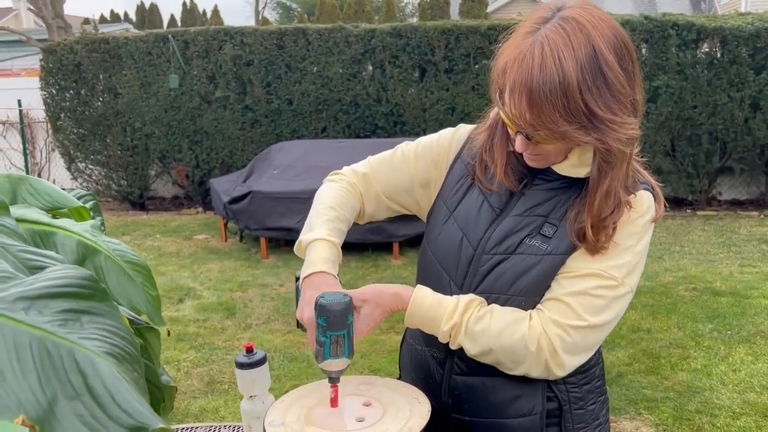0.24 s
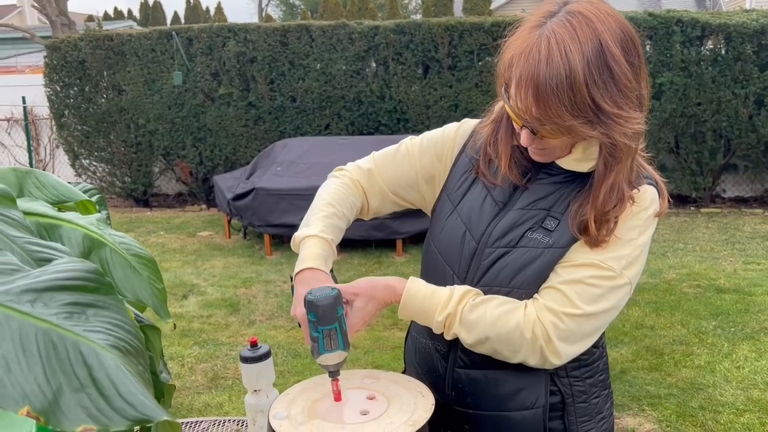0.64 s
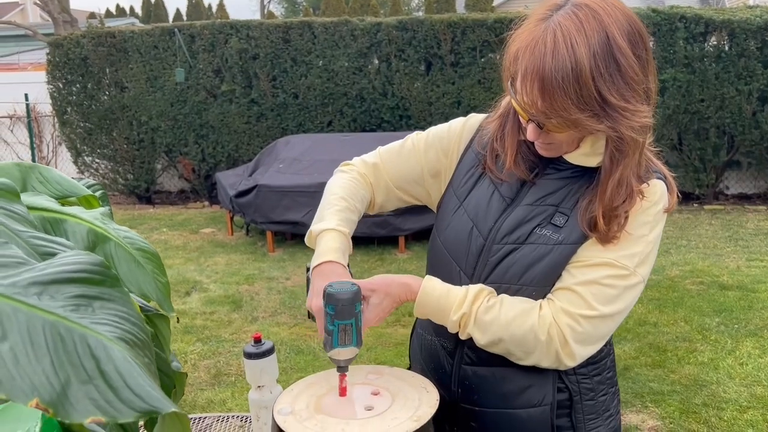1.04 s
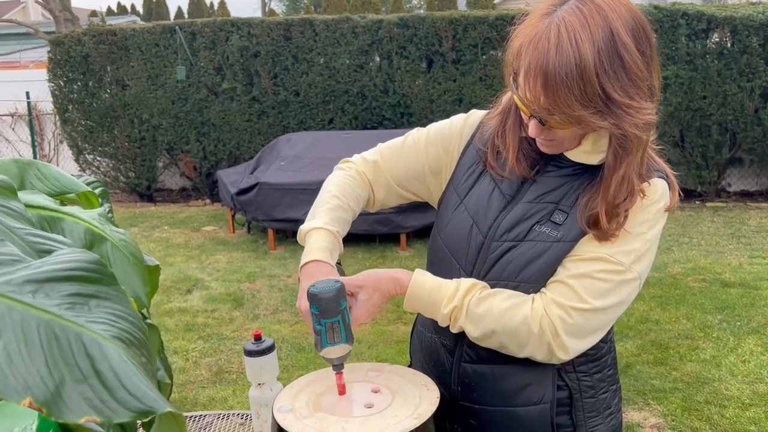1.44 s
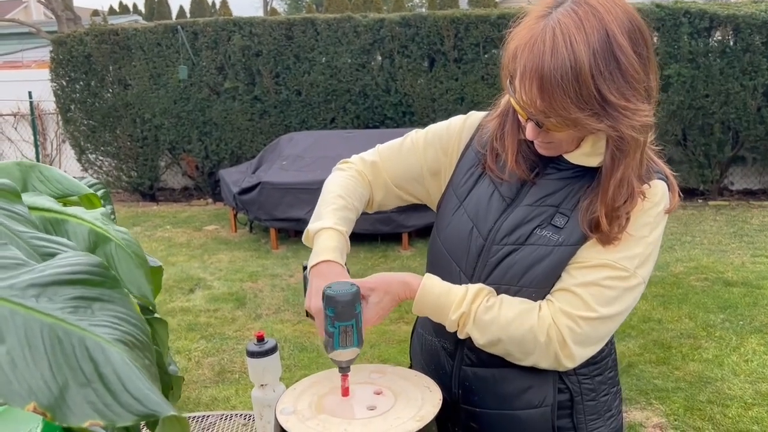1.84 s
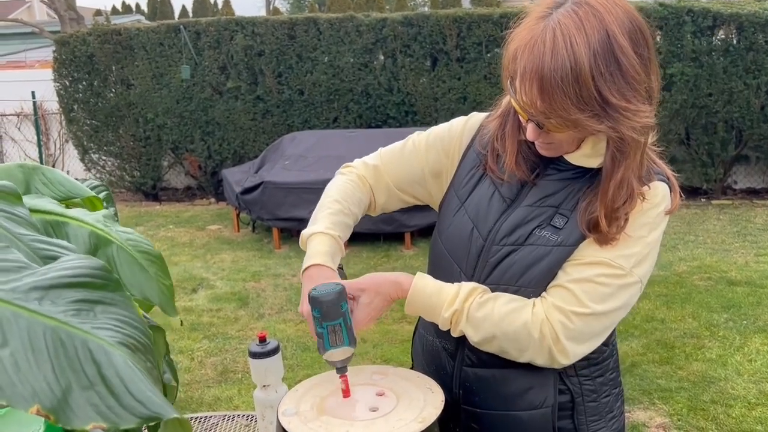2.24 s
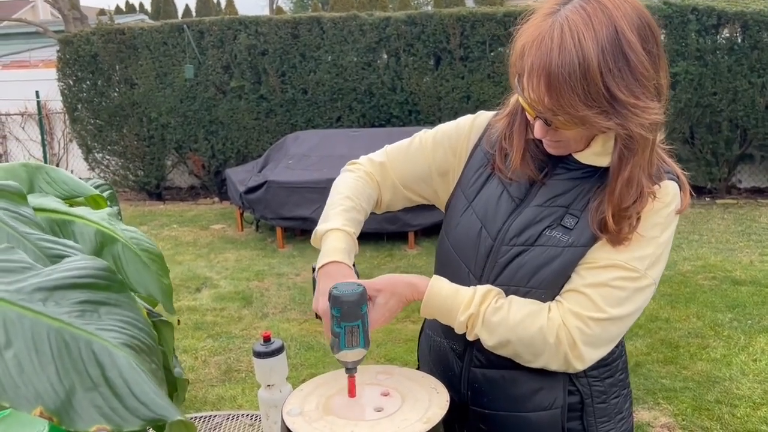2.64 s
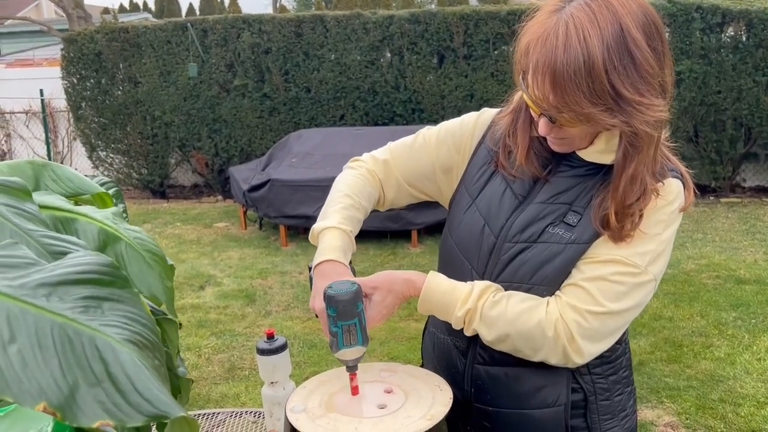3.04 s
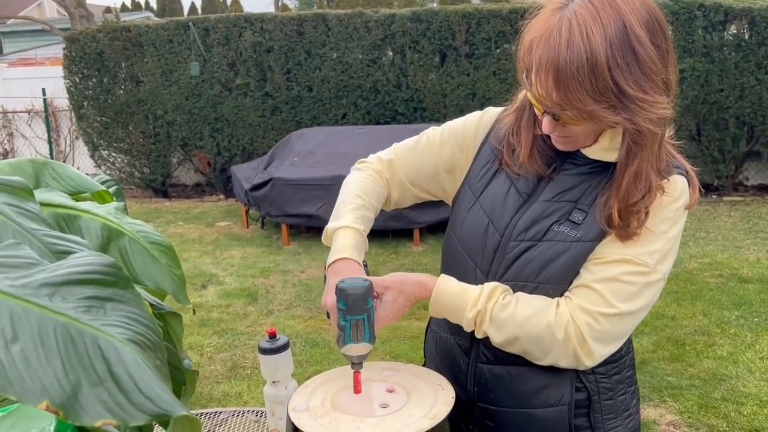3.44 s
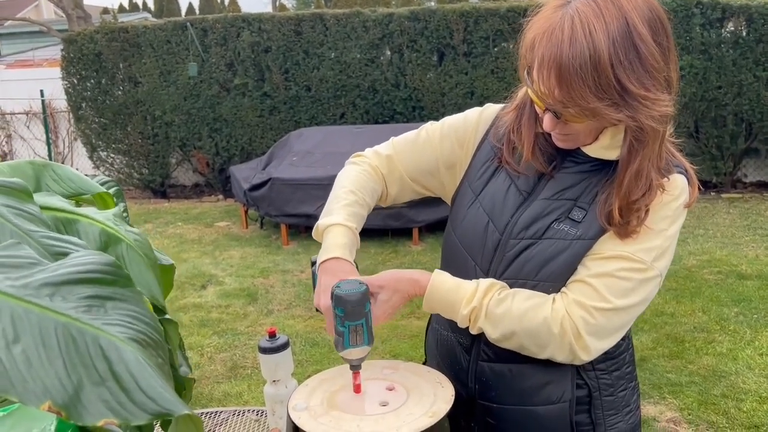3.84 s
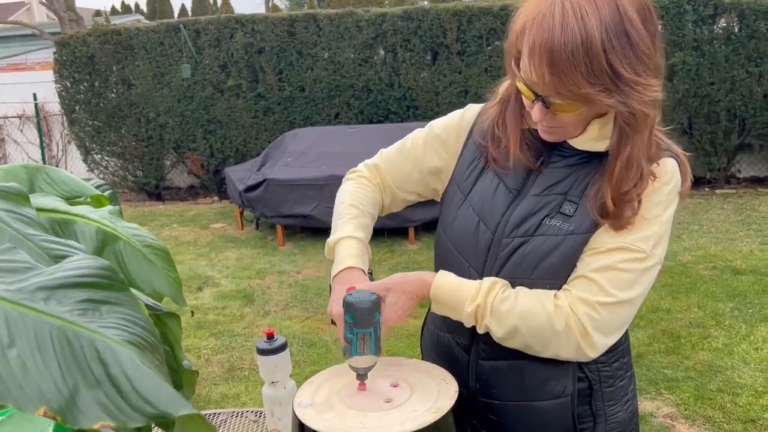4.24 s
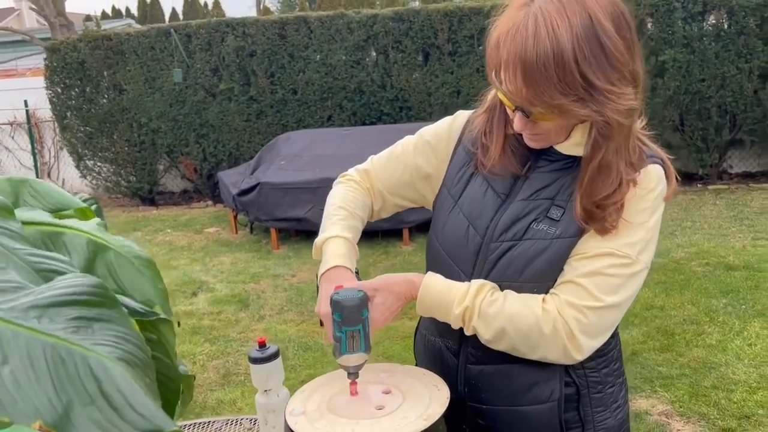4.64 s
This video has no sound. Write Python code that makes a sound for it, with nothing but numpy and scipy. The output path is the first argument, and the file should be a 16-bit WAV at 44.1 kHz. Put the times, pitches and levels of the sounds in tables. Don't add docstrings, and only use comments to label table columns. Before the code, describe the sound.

Close drilling outdoors: a diamond core bit grinds a ceramic pot base with a dense, bright, gritty rasp and hiss, fluttering rapidly with each turn and catching irregularly. Low motor tone and thin gear whine sit beneath. Just after four seconds the bit breaks through with a hard knock and rattle, squeals briefly and stops, leaving faint low yard hum. Stereo phone microphone, dry sound.

```python
import sys
import numpy as np
from scipy import signal
from scipy.fft import rfft, irfft, next_fast_len
from scipy.io import wavfile
from scipy.ndimage import map_coordinates

SR = 44100
rng = np.random.default_rng(int(sys.argv[2]) if len(sys.argv) > 2 else 0)


def decibels_to_gain(level_db):
    exponent = np.asarray(level_db, float) / 20
    return 10 ** exponent


def waveform_to_disk(signal):
    frames = np.transpose(np.atleast_2d(signal))
    scaled = np.clip(frames, -1, 1) * 32767
    samples = np.round(scaled).astype(np.int16)
    wavfile.write(sys.argv[1], SR, samples)


N = 215693
HZ = np.fft.rfftfreq(2 * next_fast_len(N // 2 + 1), 1 / SR)

RELEASE_S, BRAKE_S = 4.273, 4.331

# pitch_hz, width_hz, level_db, left_minus_right_db, right_lead_rad
BASE_MODES = [(232, 48.5, -7.5, 0.5, -0.36), (280, 62.4, -5.5, 2.5, -0.21), (577, 65, -32.5, 8.5, 0.1),
              (717, 43, -16.5, 1.5, -0.28), (791, 100, -17.5, 7.5, -0.34), (985, 106.5, -2.5, 6.5, -0.33),
              (1142, 130, -5.5, 10.5, -0.89), (1371, 99, -16.5, 1, 0.1), (1638, 180, -17, 14, -0.1),
              (1770, 39, -2.5, 5, 0.95), (1830, 72, -1.5, 1, -0.8), (2019, 133, -10, 0.5, -0.22),
              (2241, 150, -17, 1.5, -0.61)]
# pitch_hz, width_hz, level_db, left_minus_right_db, right_lead_rad
WALL_MODES = [ (2568, 190, -17.5, -1, -0.5), (2927, 116, -2.5, -8, -2.0), (3037.6, 89, 0.5, -2, -2.0),
              (3220, 53, -14.5, -1.5, -1), (3459, 81, -9.5, -4.5, -3.5), (3707, 290, -15, -3.5, -3),
              (4046, 480, -13.5, -1, 3.5), (4196, 68, -8.5, -0.5, -0.5), (4228, 96, -8.5, -8, -3.0),
              (4390, 98, -11.5, 6, 3), (4750, 68, -12, -5.5, 1.5), (5080, 37, -21, -4.5, -0.5)]
# time_s, pitch_hz, level_db
ARMATURE = [(0.0, 258, -41), (0.15, 243.2, -40), (0.3, 271, -44), (0.54, 245.3, -46.5), (0.57, 255, -88),
            (0.92, 275.2, -40), (1.08, 259.3, -41), (1.68, 267.5, -39.5), (1.93, 262, -43.5),
            (2.1, 232, -39.5), (2.26, 258, -42), (2.5, 267, -32.5), (2.65, 263, -47), (2.71, 251.7, -39),
            (3.54, 264.3, -42.5), (3.78, 267, -50.5), (3.88, 249.3, -40.5), (4.05, 268, -41.5)]
# time_s, push_db, dry_grit_bite_db
HAND = [(0.0, -2.5, -2.5), (0.17, 0, -3), (0.46, -1, -2.5), (0.78, -0.5, -3), (1.01, 0, -1), (1.8, 1.5, -1),
        (1.9, -1.5, 0.5), (2.46, 1.5, -2), (3.23, -1, 0), (3.5, 3, -2.5), (3.6, -4, 1), (3.73, -4.5, 0),
        (3.86, 1, 0.5), (4.02, -3, 0.5), (4.05, -2, -3.5), (4.09, -7.5, -1.5), (4.16, 1.5, -6),
        (4.2, -7.5, 1)]
# time_s, tip_db, slurry_db
TIP_AND_SLURRY = [(0, 2.5, 0.5), (.3, -1.5, 0.5), (.55, -0.5, 0), (.8, 2, 1), (1.1, 1, 1), (1.4, 0, 1.5),
                  (1.7, 1, 3), (2.0, 0, 2.5), (2.25, -1, 2), (2.5, 2.5, 1.5), (2.75, -1, 3.5),
                  (3.0, -0.5, 3), (3.25, 1, 4), (3.5, 0.5, 2.5), (3.65, 2, 1.5), (3.9, 1, 2),
                  (4.05, 1.5, -2.5), (4.3, 4, 0)]


def pot(turns, body_db, cavity_db, ring_db):
    # pitch_hz, width_hz, level_db, left_minus_right_db, right_lead_rad
    tube_modes = [ (5733, 160, -13, 5, 3.2), (6024, 56, -18, 9, 1.0), (6524, 120, -22.5, 1, 1),
                  (7240, 110, -18.5, 5.5, 1.6), (7526, 93, -16.5, -3, 0.44), (7800, 90, -16, 4.5, 0.55),
                  (7960, 190, -21, 2, 1), (8300, 130, -18, -5.5, 1.3), (8495, 130, -24.5, 7.5, 1.1),
                  (8890, 110, -20, 2, 1.6), (9580, 160, -18.5, 1.5, 3.1)]
    # time_s, lean_db
    drill_lean = [(0, 3), (.5, -1), (.7, -2.5), (1.0, 1.5), (1.4, -1), (2.3, 2), (2.43, -0.5), (2.6, 0.5),
                  (3.18, -1), (3.45, 6), (3.6, -0.5), (3.79, -0.5), (3.87, -3.5), (4.0, -1), (4.06, -4.5),
                  (4.3, -3.5)]
    # pitch_hz, width_hz, level_db
    stand_modes = [
        (255, 24, 10.5),
        (144, 19, -5),
        (555, 43, -14),
        (685, 97, -4),
    ]

    load_db, taps = catches()
    lean_db = read(drill_lean)[0]
    tip_db, slurry_db = read(TIP_AND_SLURRY)
    sag_db = 0.32 * (read(ARMATURE)[0] - 260)
    loose_db = -3 * np.clip((np.arange(N) / SR - 4.028) * 100, 0, 1)
    spots = [spectrum(grit(turns, repeat=0.61, catch_db=1.35) * decibels_to_gain(load_db)) for _ in range(3)]

    bands = np.zeros((3, 2, N))
    struck = np.zeros((2, len(HZ)), complex)
    opposite = np.array([[1], [-1]])
    for k, (hz, width, db, pan_db, lead) in enumerate(BASE_MODES + WALL_MODES + tube_modes):
        left, right = decibels_to_gain(pan_db / 2), decibels_to_gain(-pan_db / 2) * np.exp(1j * lead)
        ports = decibels_to_gain(db) * np.array([[left], [right]])
        band = int(hz > 400) + int(hz > 2400)
        tapped = taps[band // 2] * (hz > 700)

        tilt_db = lean_db * ((1050 < hz < 1300) - (900 < hz < 1050))
        tilt_db = tilt_db + loose_db * (900 < hz < 2400) * (1 - 0.6 * (1700 < hz < 1900))
        tilt_db = tilt_db + tip_db * ((1500 < hz < 2100) - (2800 < hz < 3100) / 2)
        tilt_db = tilt_db - slurry_db * (db < -9) * (3100 < hz < 5900)
        tilt_db = tilt_db + sag_db * ((260 < hz < 400) - (hz < 260))
        flutter_db = (0.78 - 0.075 * db) * walk(3.97) + 0.93 * walk(24.79)

        apart = 0.35 * np.clip(-db / 15, 0, 1) * (400 < hz < 9000)
        scratching = spots[k % 3] + apart * spots[k % 3 - 1] * opposite + tapped
        bands[band] += wave(scratching * pair(hz, width) * ports) * decibels_to_gain(tilt_db + flutter_db)

        free_width = (0.24 if band > 1 else 0.31) * width
        struck += ports * decibels_to_gain(7 * (band > 1)) / (1 + 2j * (HZ - hz) / free_width)

    thud = sum(decibels_to_gain(db) / (1 + 2j * (HZ - hz) / width) for hz, width, db in stand_modes) * rocking()
    low_cut = (1j * HZ / (110 + 1j * HZ)) ** 2
    out = wave((knocks() * struck + decibels_to_gain(28) * thud) * low_cut)
    for band, db in zip(bands, (cavity_db - 0.5, body_db + 4.0, ring_db + 4.5)):
        out = out + unit(band) * decibels_to_gain(db)
    return out


def grit(turns, repeat=0.65, spread_db=2.5, wobble_db=1.0, catch_db=2.0):
    rim = rng.standard_normal((2, 2048))
    blend = np.pi * walk(1.5)
    place = (turns * rim.shape[1]).astype(int) % rim.shape[1]
    same = np.cos(blend) * rim[0, place] + np.sin(blend) * rim[1, place]
    fresh = unit(rng.standard_normal(N) * decibels_to_gain(spread_db * rng.exponential(size=N)))
    wobble = np.cos(2 * np.pi * turns + 0.16 * walk(5.5))
    load_db = wobble_db * wobble + catch_db * walk(45)
    return unit((np.sqrt(repeat) * same + np.sqrt(1 - repeat) * fresh) * decibels_to_gain(load_db))


def catches():
    # time_s, peak_db, brightness_db
    hard_grains = [(0.104, -30, -12.5), (.122, -21.5, -14.5), (0.185, -23.5, -10.5), (0.23, -17, -12),
                   (0.281, -25, -10), (0.34, -19, 1.5), (0.464, -15, -12), (0.531, -28, -14.5),
                   (0.584, -18, -15.5), (.611, -20, -8), (0.735, -27, -4.5), (0.863, -19.5, -14),
                   (0.943, -16, -12), (0.983, -15.5, -14.5), (1.031, -18, -7.5), (1.063, -26.5, -11),
                   (1.104, -17, -17.5), (1.139, -28, -9.5), (1.173, -25.5, -4.5), (1.201, -29.5, -3.5),
                   (1.261, -18, -14), (1.292, -11.5, -8), (1.407, -21.5, -7.5), (1.443, -17.5, -18),
                   (1.522, -23, -5.5), (1.556, -12, -16.5), (1.628, -15, -14), (1.675, -22, -8.5),
                   (1.719, -21.5, -12.5), (1.739, -16.5, -14), (1.791, -17.5, -6), (1.859, -22.5, -10),
                   (1.911, -24, -1), (2.067, -16.5, -8.5), (2.107, -18, -7), (2.149, -21, -7),
                   (2.196, -28, -4.5), (2.233, -22, 2.5), (2.275, -23, -10.5), (2.346, -26.5, -12),
                   (2.42, -13.5, -9.5), (2.47, -21, -2), (2.557, -19, -13), (2.601, -15.5, -14.5),
                   (2.647, -12.5, -17.5), (2.801, -17.5, -13), (2.844, -16.5, -8.5), (2.882, -14, -12),
                   (2.922, -17.5, -4.5), (3.121, -21, -5.5), (3.233, -21.5, -8), (3.269, -18, -15),
                   (3.321, -15.5, -13.5), (3.387, -19.5, -13.5), (3.476, -19.5, -14), (3.513, -14, -8.5),
                   (3.778, -26.5, -9.5), (3.816, -20, -5), (3.999, -19.5, -4.5), (4.051, -24.5, -11)]
    rise_s, fall_s, usual_db, tap_db = 0.002, 0.0062, -22, 40

    load, taps = np.zeros(N), np.zeros((2, N))
    for s, db, bright_db in hard_grains:
        load[int(s * SR)] = np.clip(db - usual_db, 0, None) / 6
        dull, bright = decibels_to_gain(db + tap_db), decibels_to_gain(db + bright_db + 8.0 + tap_db)
        taps[:, int((s - rise_s) * SR)] = dull, bright

    after = np.arange(SR // 20) / SR
    swell = np.exp(-after / fall_s) - np.exp(-after / rise_s)
    extra_db = 3.5 * np.convolve(load, swell / swell.max())[:N]
    lull_length = int(2 * 0.005 * SR)
    lull = np.convolve(np.clip(load, 0, 1), np.hanning(lull_length))[lull_length:]
    return extra_db - 3.5 * np.append(lull, 0), spectrum(taps)


def knocks():
    # time_s, level_db, push_ms
    knock_pushes = [
        (4.0951, 2.5, 0.2),
        (4.0962, -9, .15),
        (4.0991, -3.5, 0.23),
        (4.11, -15.5, 0.12),
        (4.1168, -11, 0.12),
        (4.125, -9, 0.12),
        (4.129, -15, 0.12),
        (4.145, -13.5, .25),
        (4.158, -8.5, 0.25),
        (4.171, -14.5, .12),
    ]
    t, force = np.arange(N) / SR, np.zeros(N)
    for s, db, ms in knock_pushes:
        force += decibels_to_gain(db) * np.sin(np.pi * np.clip((t - s) / (ms / 1000), 0, 1)) / ms
    return spectrum(force)


def rocking():
    thud_s, rattle_db, decay_s = 4.0995, -39, 0.092
    after = np.arange(N) / SR - thud_s
    rattle = decibels_to_gain(rattle_db) * rng.standard_normal(N) * np.exp(-np.abs(after) / decay_s) * (after > 0)
    return np.exp(-2j * np.pi * HZ * thud_s) + spectrum(rattle)


def hiss(turns, high_db, scrape_db):
    # pitch_hz, level_db per Hz
    dust_colour = [(400, -38), (800, -16), (2400, -8), (3400, 0), (5400, -3), (5490, -13), (5580, -4),
                   (6900, -9), (8600, -13), (9100, -6), (10300, -14), (11100, -8), (13900, -6),
                   (15700, -10)]
    colour = shape(dust_colour)
    ripple_db = 6 / (1 + (HZ / 12500) ** 4)
    small_modes = []
    for _ in range(3):
        bumps = np.interp(HZ / 70, np.arange(400), rng.standard_normal(400))
        small_modes.append(decibels_to_gain(ripple_db * bumps))
    dust = [spectrum(grit(turns, repeat=0.1, wobble_db=1.6, catch_db=0.6)) for _ in range(3)]
    near, left, right = (colour * modes * grains for modes, grains in zip(small_modes, dust))

    lag = np.exp(2j * np.pi * HZ / 6600)
    scatter = np.clip(HZ / 7500, 0, 1) ** 1.5 / (1 + (HZ / 8600) ** 18) + 0.03 + 0.4 * (HZ > 14600)
    both = np.array([near + scatter * left, near * lag + scatter * right])

    top = 1 / (1 + (9500 / (HZ + 1)) ** 8)
    wet = 1 / (1 + ((HZ - 4500) / 1300) ** 6)
    slurry_db = read(TIP_AND_SLURRY)[1]
    scratch = wave(both * (1 - top) * wet) * decibels_to_gain(-slurry_db) + wave(both * (1 - top) * (1 - wet))
    return unit(wave(both * top)) * decibels_to_gain(high_db + 5.0) + unit(patchy(scratch, 2.1)) * decibels_to_gain(scrape_db - 6.5)


def motor(turns):
    # multiple, level_db
    chuck_orders = [
        (5, -74),
        (6, -62.5),
        (7, -63.5),
        (9, -62),
        (11, -60),
    ]
    hz, db = read(list(ARMATURE) + [(4.08, ARMATURE[-1][1], -95.5)])
    throb_db = 1.5 + 2.0 * walk(26)
    tone = decibels_to_gain(db + throb_db) * np.sin(2 * np.pi * np.cumsum(hz * (1 + 0.009 * walk(29.97))) / SR)
    chuck = np.zeros(N)
    for k, order_db in chuck_orders:
        chuck += decibels_to_gain(order_db + 5.9 * walk(3.3)) * np.sin(2 * np.pi * k * turns + 1.5 * walk(5.6))
    cutting = np.arange(N) < 4.09 * SR
    return (tone + chuck * cutting) * decibels_to_gain(np.array([[0.5], [-0.5]]))


def gears():
    # time_s, pitch_hz, level_db
    gear_whine = [(0.0, 1380, -40), (0.01, 1390, -62), (0.66, 1340, -50), (0.78, 1388, -70),
                  (0.97, 1370, -55), (1.03, 1401, -45), (1.62, 1390, -58), (2.03, 1402, -43.5),
                  (2.1, 1323, -51), (3.46, 1397, -42), (3.63, 1312, -43.5), (3.99, 1346, -43),
                  (4.03, 1301, -55), (4.05, 1417, -62)]
    hz, db = read(list(gear_whine) + [(4.09, gear_whine[-1][1], -86.5)])
    phase = 2 * np.pi * np.cumsum(hz * (1 + 0.0036 * walk(40))) / SR
    tone = np.sqrt(2) * decibels_to_gain(db - 3 + 2.5 * walk(25)) * np.sin(phase)
    return tone * decibels_to_gain(np.array([[2.5], [-2.5]]))


def squeal():
    # start_s, hold_s, pitch_hz, level_db
    squeal_bursts = [(4.028, 0.012, 947, -33.5), (4.052, 0.014, 964, -28.5), (4.081, 0.008, 944, -26.5),
                     (4.14, 0.0036, 950, -25.5), (4.159, .004, 949, -46), (4.2015, 0.018, 958, -20),
                     (4.237, 0.015, 970, -31), (4.257, 0.016, 950, -32), (4.284, 0.015, 964, -41.5),
                     (4.336, 0.027, 962, -55), (4.866, .04, 960, -64)]
    attack_s, ring_s = 0.005, 0.005
    t, size = np.arange(N) / SR, np.zeros(N)
    for start, hold, _, db in squeal_bursts:
        ringing = np.clip(t - start - attack_s - hold, 0, None)
        size += decibels_to_gain(db) * np.clip((t - start) / attack_s, 0, 1) * np.exp(-ringing / ring_s)
    hz = read([(start, pitch) for start, _, pitch, _ in squeal_bursts])[0]
    out = np.sqrt(2) * size * decibels_to_gain(0.54 * walk(65)) * np.sin(2 * np.pi * np.cumsum(hz) / SR)
    return out * decibels_to_gain(np.array([[2.5], [-2.5]]))


def hedge():
    # pitch_hz, level_db per Hz
    hedge_colour = [(400, -36), (620, -14.5), (1500, -4.5), (2800, -7), (4500, -4.5), (7000, -18.5),
                    (9000, -42.5)]
    t = np.arange(N) / SR
    tint = 0.3
    for hz, width, db, _, _ in BASE_MODES + WALL_MODES:
        tint = tint + decibels_to_gain(db / 2) * np.abs(pair(hz, 1.5 * width))
    noise = spectrum(rng.standard_normal((2, N)))
    wash = unit(patchy(wave(noise * shape(hedge_colour) * tint), 3.5))
    return wash * decibels_to_gain(-44.5 - 136 * np.clip(t - BRAKE_S, 0, None))


def yard():
    # pitch_hz, level_db per Hz
    air_colour = [(20, -26), (45, -1.5), (70, 1.5), (130, -3.5), (300, -12), (410, -13), (700, -10.5),
                  (1500, -23), (2400, -30), (3400, -39), (4300, -34.5), (6000, -50), (12000, -51.5)]
    t = np.arange(N) / SR
    stopped = np.clip(t - BRAKE_S, 0, None)
    fading = decibels_to_gain(-51 - 3.5 * np.clip(t - 2.7, 0, None) - 26 * stopped)
    swell = decibels_to_gain(-57.5) * np.exp(-((t - 4.79) / 0.041) ** 2)
    hum = np.sqrt(2) * (fading + swell) * decibels_to_gain(2.0 * walk(12)) * np.sin(2 * np.pi * 70.2 * t)

    mid, side = (unit(wave(spectrum(rng.standard_normal(N)) * shape(air_colour))) for _ in range(2))
    rumble = np.hypot(decibels_to_gain(-60), decibels_to_gain(-58.5 - 54 * stopped))
    air = (mid + decibels_to_gain(-7.0) * side * np.array([[1], [-1]])) * rumble * decibels_to_gain(walk(12.0))

    chirp = decibels_to_gain(-79) * np.exp(-((t - 4.795) / 0.0046) ** 2) * np.sin(2 * np.pi * 5860 * t)
    whistle = decibels_to_gain(-81 + 2.0 * walk(30.2)) * np.clip((t - 4.78) * 50, 0, 1) * np.sin(2 * np.pi * 2310 * t)
    return hum + air + chirp + whistle


def layer(level_db, per_push, per_bite, shatter_db, fall, echo_db, brake=0.0, freed_db=0.0):
    break_s, shatter_s = 4.095, 0.017
    t = np.arange(N) / SR
    push, bite = read(HAND)
    cut = level_db + per_push * push + per_bite * bite + freed_db * (t > break_s - 0.05)
    cut = cut - fall * np.clip(t - RELEASE_S, 0, None) - brake * np.clip(t - BRAKE_S, 0, None)
    burst = decibels_to_gain(shatter_db) * np.exp(-np.abs(t - break_s) / shatter_s) * (t > break_s)
    echo = decibels_to_gain(echo_db - 104.5 * (t - BRAKE_S)) * (t > RELEASE_S)
    return 20 * np.log10(decibels_to_gain(cut) + burst + echo)


def patchy(x, depth_db, patch_hz=260, patch_s=0.07):
    hz, s, z = signal.stft(x, SR, nperseg=512)
    knots = rng.standard_normal((120, 120))
    places = np.meshgrid(hz / patch_hz, s / patch_s, indexing="ij")
    field = map_coordinates(knots, places, order=1, mode="mirror")
    return signal.istft(z * decibels_to_gain(depth_db * field), SR, nperseg=512)[1][..., :N]


def pair(hz, width):
    s = 2j * (HZ - hz) / width
    return 1 / ((1 + s) * (1 + s + s * s))


def walk(rate):
    knots = rng.standard_normal(400)
    return 1.166 * np.interp(np.arange(N) * rate / SR, np.arange(len(knots)), knots)


def read(table):
    s, *columns = np.transpose(table)
    return [np.interp(np.arange(N) / SR, s, c) for c in columns]


def shape(points):
    hz, db = np.transpose(points)
    return decibels_to_gain(np.interp(np.log(HZ + 1), np.log(hz), db))


def unit(x):
    return x / np.sqrt(np.mean(x ** 2))


def spectrum(x):
    return rfft(x, 2 * len(HZ) - 2)


def wave(z):
    return irfft(z)[..., :N]


def scene():
    stop_fall = 598.5
    body_db = layer(-31.5, per_push=1, per_bite=0, shatter_db=-26, fall=203, echo_db=-83)
    cavity_db = layer(-41.5, per_push=0.5, per_bite=0, shatter_db=-40, fall=178, echo_db=-54.5)
    ring_db = layer(-30.5, per_push=0.82, per_bite=1.5, shatter_db=-23, fall=167, echo_db=-65)
    scrape_db = layer(-30, per_push=0.94, per_bite=2, shatter_db=-13.5, fall=113, echo_db=-54,
                      brake=stop_fall / 3)
    dust_db = layer(-43.5, per_push=1, per_bite=2, shatter_db=-37, fall=93, echo_db=-83,
                    brake=stop_fall, freed_db=6.5)

    spin_down_s, turns_per_s = 0.15, 25.9
    coast = np.exp(-np.clip(np.arange(N) / SR - RELEASE_S, 0, None) / spin_down_s)
    turns = np.cumsum(turns_per_s * coast * (1 + 0.0056 * read(HAND)[0] + 0.003 * walk(3))) / SR
    slack_db = 30 * np.log10(coast)
    tool = pot(turns, body_db + slack_db / 2, cavity_db, ring_db + slack_db)
    tool = tool + hiss(turns, dust_db, scrape_db) + motor(turns) + gears() + squeal()
    return tool + hedge() + yard()


def band_limit(x):
    return signal.sosfilt(signal.butter(12, 15960, fs=SR, output="sos"), x)


def record(dry):
    soft = np.tanh(0.6 * dry) / 0.6
    top_cut = signal.ellip(12, 0.3, 80, 15600, fs=SR, output="sos")
    mix = signal.sosfilt(top_cut, soft)
    return band_limit(mix)


dry = scene()
out = record(dry)
waveform_to_disk(out)
```